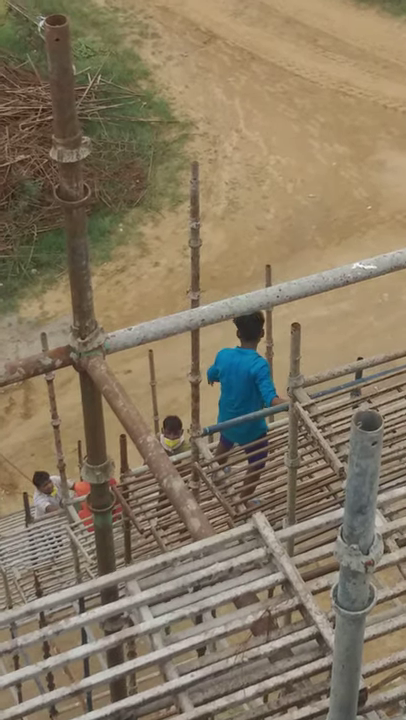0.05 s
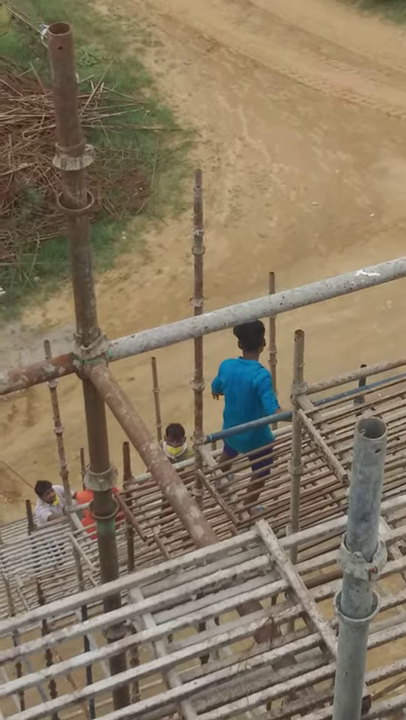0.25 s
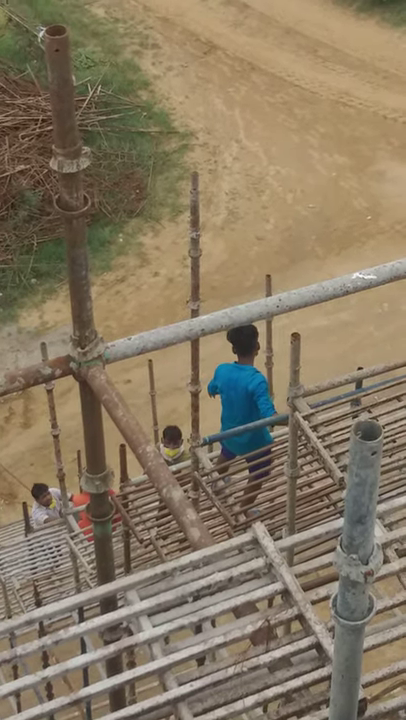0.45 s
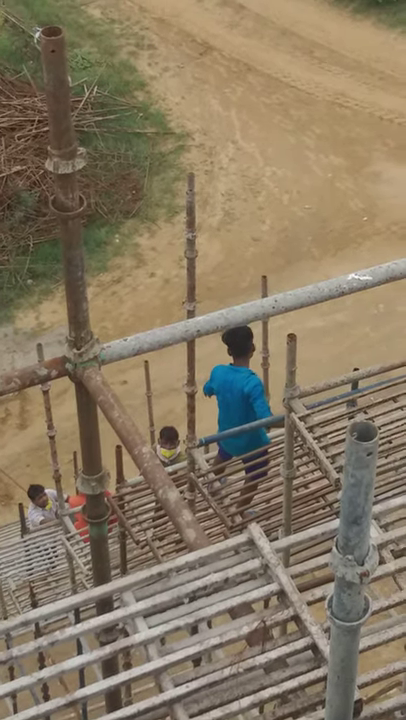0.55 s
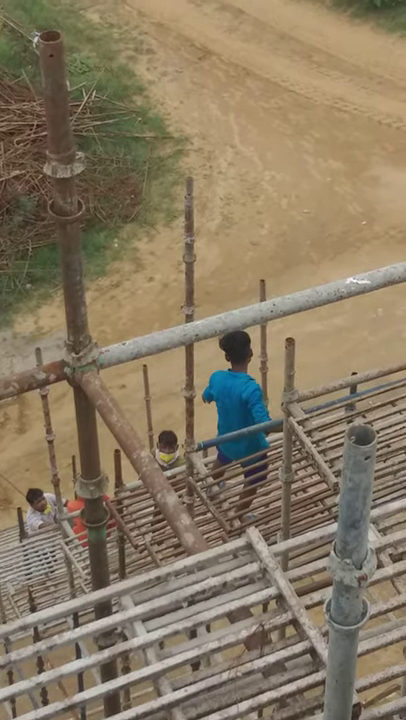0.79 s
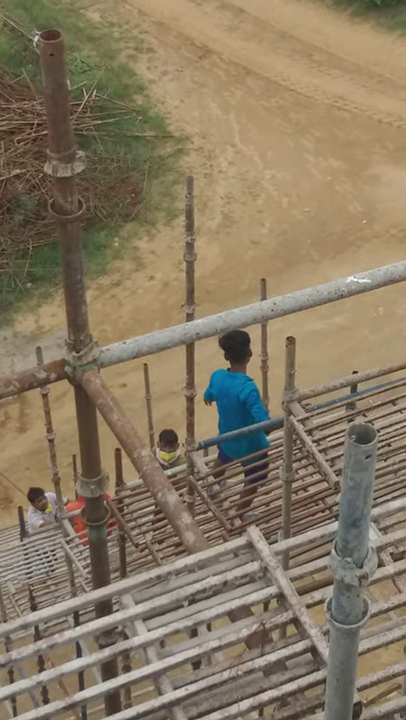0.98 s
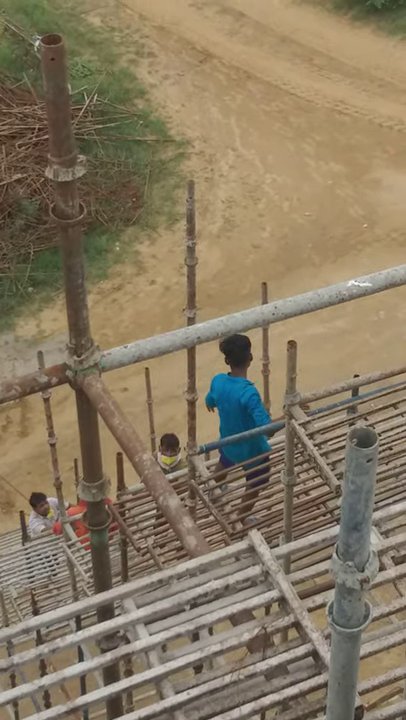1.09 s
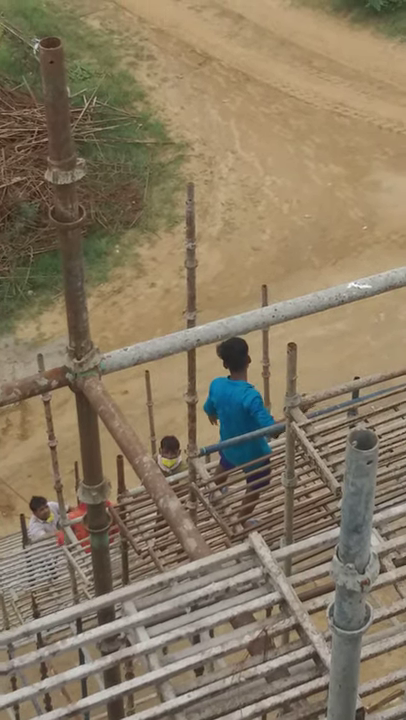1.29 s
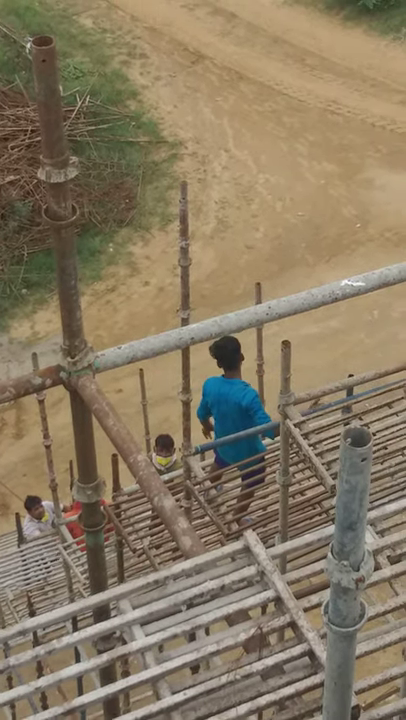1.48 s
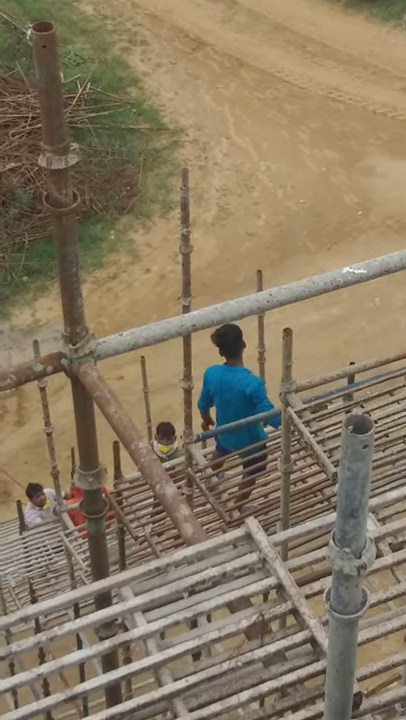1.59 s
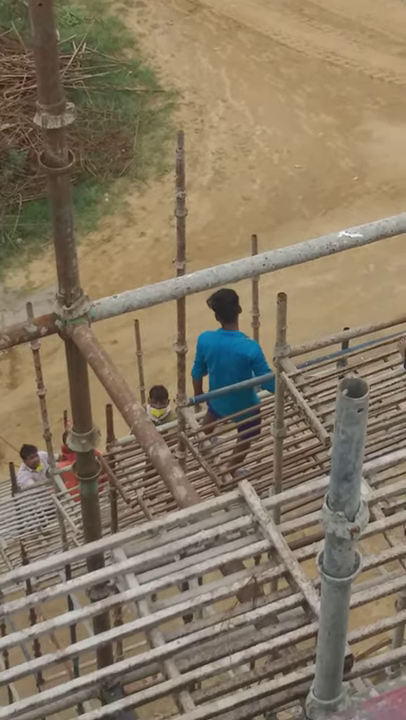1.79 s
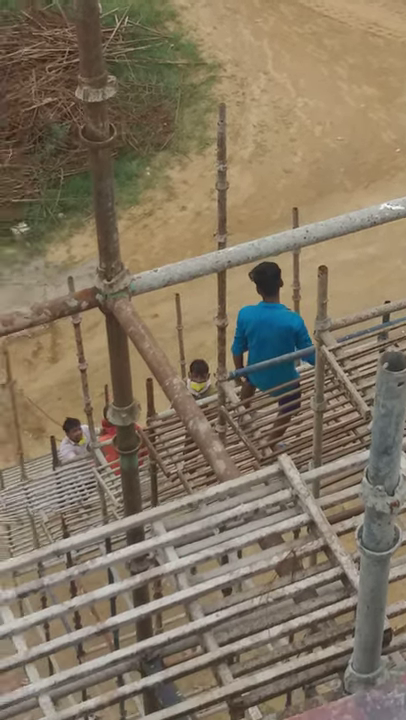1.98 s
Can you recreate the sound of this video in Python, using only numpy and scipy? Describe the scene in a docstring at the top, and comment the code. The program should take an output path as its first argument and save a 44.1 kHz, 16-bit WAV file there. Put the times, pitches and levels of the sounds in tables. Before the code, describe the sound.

A steel bar drops with a bright ringing clang, then duller knocks rattle across metal scaffolding outdoors.

```python
"""Steel bar dropped on a scaffold

A steel reinforcing bar lands on a stack of bars: noise bursts make the contact and chatter, fading
sines and crowded partials make the bright ring, which is damped as the bar settles. Duller knocks
follow as the bars shift: random mixtures of fixed modes. The deck of tubes thuds, booms and rattles
under the workers, and a neighbouring bar clinks. Shaped noise makes the low open-air rumble and hiss."""
import sys
import numpy as np
from scipy import signal
from scipy.fft import rfft, irfft, next_fast_len
from scipy.io import wavfile

SR = 44100
rng = np.random.default_rng(int(sys.argv[2]) if len(sys.argv) > 2 else 0)


def store_wav(level_fs):
    """Save 16-bit WAV to argv[1]."""
    pcm = np.round(np.clip(np.atleast_2d(level_fs), -1, 1) * 32767)
    wavfile.write(sys.argv[1], SR, pcm.T.astype(np.int16))


N = 90404
SIZE = next_fast_len(N)  # a length that transforms quickly
T, FREQ = np.arange(N) / SR, np.fft.rfftfreq(SIZE, 1 / SR)  # time [s], frequency [Hz]
NEXT_S, NEXT_RISE_S = 0.862, 0.004  # time of the neighbouring bar's clink; build-up of its tones


def amp(db):
    """Turn decibels into a plain multiplier."""
    return 10 ** (np.asarray(db) / 20)


def unit(x):
    """Scale a sound to an rms (average strength) of 1."""
    return x / np.sqrt(np.mean(x ** 2))


def colour(points):
    """Gain per frequency through (Hz, dB) points, falling 48 dB per octave outside them."""
    hz, db = np.array(points, float).T
    octave = np.log2(np.maximum(FREQ, 1))
    nearest = np.clip(octave, np.log2(hz[0]), np.log2(hz[-1]))
    outside = np.abs(octave - nearest)
    return amp(np.interp(octave, np.log2(hz), db) - 48 * outside)


def excite(spectrum):
    """Sound every frequency of a spectrum with a new random phase; rms 1."""
    phases = np.exp(2j * np.pi * rng.random(len(FREQ)))
    return unit(irfft(spectrum * phases, SIZE)[:N])


def noise(points):
    """Noise coloured by (Hz, dB) points; rms 1."""
    return excite(colour(points))


def crowd(spacing_hz, scatter_db):
    """Spectrum of up to 800 thin lines: unevenly spaced modes of unequal strength."""
    place, strength = rng.uniform(-1, 1, (800, 2)).T
    hz = (np.arange(len(place)) + 1 + place / 2) * spacing_hz
    bins = np.abs(hz * SIZE / SR).astype(int)
    audible = bins < len(FREQ)
    lines = np.zeros(len(FREQ))
    lines[bins[audible]] = amp(scatter_db * strength)[audible]
    return lines


def envelope(start, rise, t60, hold=0):
    """Straight build-up, hold, then a decay that loses 60 dB every t60 seconds."""
    age = T - start
    build_up = np.clip(age / max(rise, 1e-4), 0, 1)
    return build_up * np.exp(-np.log(1000) * np.maximum(age - rise - hold, 0) / t60)


def flutter(rate):
    """Random wavering: 'rate' random points a second, joined by straight lines."""
    return np.interp(T * rate, np.arange(2000), rng.standard_normal(2000))


def mode(start, rise, hz, db, t60):
    """One decaying sine of random phase; its level counts as rms before the envelope."""
    sine = np.sin(2 * np.pi * (hz * T + rng.random()))
    return np.sqrt(2) * amp(db) * envelope(start, rise, t60) * sine


def damping(start, db_per_s):
    """Extra decay from a given time on, as when a ringing bar is touched."""
    return amp(-db_per_s * np.maximum(T - start, 0))


def background():
    """Open air: a wavering low rumble and a faint, steady hiss, both made of shaped noise."""
    # colour of the rumble and of the hiss: (frequency [Hz], relative level [dB])
    rumble = [(25, -30), (70, -1), (140, 0.5), (380, -4), (600, -19.5), (1000, -29.5), (2000, -34),
              (3000, -53.5)]
    hiss = [(1000, 6.5), (13500, -2), (15500, -8)]
    wavering_db = -50 + 2 * flutter(14)
    return amp(wavering_db) * noise(rumble) + amp(-78) * noise(hiss)


def shudder():
    """The whole scaffold shakes: deep noise whose level rises and falls with time."""
    # colour of the shaking: (frequency [Hz], relative level [dB])
    shake_colour = [(40, -27.5), (65, -7), (145, 2), (260, -16)]
    # strength of the shaking: (time [s], level [dB])
    shake_level = [(0, -52), (.14, -59), (.24, -33.5), (.4, -42), (.72, -40.5), (.95, -49.5), (1.14, -40.5),
                   (1.6, -47.5), (2.05, -53)]
    seconds, db = np.array(shake_level).T
    return amp(np.interp(T, seconds, db)) * noise(shake_colour)


def fading_bar():
    """A bar still ringing faintly at the start: one dying sine."""
    # its single mode: (frequency [Hz], level [dB], t60 [s])
    fading = (1981, -66, .6)
    return mode(0, NEXT_RISE_S, *fading)


def stack():
    """Each knock rings the same crowded modes of deck, tubes and bars: a crack, then a rattling tail."""
    # knocks: (time [s], build-up [s], deck thud [dB], tube clack [dB], bar ring [dB], bright zing [dB])
    knocks = [(0.159, 0.006, -41.5, -69, -87, -93), (0.222, 0.011, -25, -23.5, -32, -67),
              (0.265, 0.0021, -27.5, -27, -25, -53), (0.392, 0.013, -33, -35.5, -37, -40),
              (0.452, 0.0052, -32, -34.5, -39, -58), (0.565, 0.018, -30, -31, -42.5, -43.5),
              (0.600, 0.0039, -29, -35, -33, -36), (0.686, 0.0013, -31, -35.5, -42, -61),
              (0.866, 0.0017, -42, -40.5, -42.5, -46.5), (0.986, 0.00081, -39, -52.5, -80.5, -88),
              (1.03, 0.0046, -33, -37, -43.5, -55), (1.121, .005, -34, -39, -46.5, -59),
              (1.172, 0.028, -37, -41, -42, -74), (1.319, 0.0029, -38.5, -43.5, -53.5, -94.5),
              (1.339, 0.0024, -36.5, -42.5, -47.5, -73.5), (1.439, 0.0012, -32, -39, -48, -77),
              (1.492, 0.011, -38.5, -44, -50.5, -78), (1.713, 0.0025, -38.5, -49.5, -63, -85),
              (1.738, .012, -45, -53, -56.5, -84), (1.907, 0.0028, -41, -49.5, -64, -90),
              (1.927, 0.0018, -37.5, -44.5, -56, -84.5), (1.992, .003, -46.5, -50.5, -56.5, -81.5)]
    # four registers: (colour as (frequency [Hz], relative level [dB]), mode spacing [Hz], t60 [s])
    thud = ([(80, -28), (150, -6.5), (260, 2), (420, 0), (560, -5), (750, -21.5)], 4, 0.63)
    clack = ([(400, -17), (600, 5.5), (850, 2.5), (1100, -0.5), (1350, -17), (1700, -24.5)], 9, 0.48)
    ring = ([(1100, -26), (1500, 2), (1750, 5.5), (2200, 0), (2750, -30)], 16, 0.44)
    zing = ([(2400, -8.5), (3400, -1), (4800, -4), (5900, -15), (7200, -15), (8400, -40)], 40, 0.37)
    crack_db, crack_s = -13, 0.0053  # extra strength at the start of a knock, and its decay time
    rattle_db, rattle_per_s = 1, 220  # unevenness of the tail, and its random points a second

    registers = []
    for points, spacing, t60 in (thud, clack, ring, zing):
        registers.append((crowd(spacing, scatter_db=6.5) * colour(points), t60))

    out = np.zeros(N)
    for start, rise, *levels in knocks:
        crack = 1 + amp(crack_db) * np.exp(-np.maximum(T - start, 0) / crack_s)
        rattle = amp(rattle_db * flutter(rattle_per_s))
        ringing = np.zeros(N)
        for db, (lines, t60) in zip(levels, registers):
            ringing += amp(db) * excite(lines) * envelope(start, rise, t60)
        out += crack * rattle * ringing
    return out


def dropped_bar():
    """A bright contact and chatter start the bar's modes, which die faster once it lies on the stack."""
    # colours of first contact, chatter, crowded upper partials, stack ringing along,
    # and fine high partials that shimmer in the tail: (frequency [Hz], relative level [dB])
    tink_colour = [(2800, -18.5), (3400, 7), (3900, -1), (6000, -15.5), (7000, -1), (9300, -29),
                   (15500, -21)]
    chatter_colour = [(900, -16.5), (1350, 0.5), (2200, 3.5), (2850, -9.5), (3500, 5), (4800, 0),
                      (5800, -7.5), (7500, -9.5), (9200, -34), (15500, -19.5)]
    partial_colour = [(2400, -8.5), (2900, -17), (3300, -5.5), (4700, -4.5), (5700, -11), (7700, -7),
                      (8600, -22), (9400, -33)]
    wash_colour = [(900, -17.5), (1350, -0.5), (2200, 5), (2850, -11), (4800, -3.5), (8000, -21.5)]
    shimmer_colour = [(8600, -10.5), (9400, -21.5), (10300, -8), (12000, 0), (13400, -7), (15500, -5.5)]
    # main modes, before trim and damping: (frequency [Hz], relative level [dB], t60 [s])
    bar_modes = [(1668, -27.5, .7), (1719, -28.5, .72), (1829, -26, .65), (1916, -22.5, 1.4),
                 (2101, -29.5, 1.6), (2163, -34, 1.4), (2198, -27.5, .8), (3327, -36, .66),
                 (3417, -29, .55), (3499, -37, .6), (3649, -29.5, .62), (3706, -28.5, .81),
                 (4048, -34, .55), (4163, -33, .62), (4285, -37, 1.1), (4420, -36, .6), (4549, -34.5, .9),
                 (4681, -34, .6), (4818, -41, 1.6), (4973, -33.5, .46), (5712, -45, 1.4), (6331, -47, .9),
                 (7402, -42, .6), (7765, -43, .75), (10130, -61, 1.8), (10900, -60, 1.3), (11487, -45, .5)]
    # thin partials, undamped until the next clink: (frequency [Hz], level [dB], t60 [s] before damping)
    bar_sing = [(5173, -48.5, 1.7), (7187, -56, 1.6)]
    drop_s, settle_s = 0.2191, 0.66  # first contact; start of the damping
    ring_rise_s, chatter_rise_s = 0.041, 0.0083
    settle_db_per_s, ring_damp_db_per_s = 75, 92

    tink = amp(-23.5) * noise(tink_colour) * envelope(drop_s, 0.002, 0.17)

    chatter_db = -21 + 2 * flutter(350)
    chatter = amp(chatter_db) * noise(chatter_colour)
    chatter *= envelope(drop_s, chatter_rise_s, 0.17, hold=0.035)

    partials = amp(-29) * excite(crowd(75, scatter_db=3) * colour(partial_colour))
    partials *= envelope(drop_s, chatter_rise_s, 1)
    wash = amp(-29.5) * excite(crowd(19, scatter_db=6.5) * colour(wash_colour))
    wash *= envelope(drop_s, ring_rise_s, 1)
    shimmer = amp(-37) * excite(crowd(48, scatter_db=6.5) * colour(shimmer_colour))
    shimmer *= envelope(drop_s, ring_rise_s, 0.79)
    crowded = (partials + wash + shimmer) * damping(settle_s, settle_db_per_s)

    ring = amp(-0.5) * sum(mode(drop_s, ring_rise_s, *row) for row in bar_modes)
    ring *= damping(settle_s, ring_damp_db_per_s)
    sing = sum(mode(drop_s, ring_rise_s, *row) for row in bar_sing)
    sing *= damping(NEXT_S, settle_db_per_s)
    return tink + chatter + crowded + ring + sing


def deck_booms():
    """Heavy knocks set single tubes of the deck booming, each a decaying sine."""
    # booms: (time [s], frequency [Hz], level [dB], t60 [s])
    tube_booms = [(0.231, 271, -29.5, 0.79), (.66, 176.4, -35, 0.23), (0.688, 365.6, -29, 0.22),
                  (0.889, 352, -42.5, 0.43), (1.333, 594.5, -36.5, 0.21)]
    return sum(mode(start, 0.019, hz, db, t60) for start, hz, db, t60 in tube_booms)


def next_bar():
    """A neighbouring bar clinks lightly: a noisy contact and a set of decaying sines."""
    # colour of the contact: (frequency [Hz], relative level [dB])
    clink_colour = [(700, 6), (1250, -2.5), (2200, 8), (2900, -22), (3500, -4), (5400, -6.5), (7500, -30)]
    # modes of the bar: (frequency [Hz], relative level [dB])
    next_modes = [(1739, -5), (1992, -1), (2110, 1), (2202, -2), (2315, 1), (3295, -7), (3531, -4),
                  (3628, -7), (4430, -9), (4549, -8), (4689, -5), (4834, -8), (5399, -11)]
    modes_db, modes_t60_s = -46, 0.44
    contact = amp(-43) * noise(clink_colour) * envelope(NEXT_S, NEXT_RISE_S, 0.24, hold=0.032)
    ring = sum(mode(NEXT_S, NEXT_RISE_S, hz, modes_db + db, modes_t60_s) for hz, db in next_modes)
    return contact + ring


def rap(start):
    """A hard contact sets a few heavily damped modes off together."""
    # modes of the contact: (frequency [Hz], relative level [dB], t60 [s])
    rap_modes = [(370, -3, 0.026), (605, -1, 0.024), (860, -9, 0.03), (1724, -15.5, 0.033)]
    out = np.zeros(N)
    for hz, db, t60 in rap_modes:
        out += amp(db) * envelope(start, 0.001, t60) * np.sin(2 * np.pi * hz * (T - start))
    return out


def deck_raps():
    """Heavy knocks make hard, dead contacts on the deck, which die within hundredths of a second."""
    # contacts: (time [s], level [dB])
    rap_times = [(1.032, -28), (1.4385, -24.5), (1.457, -31.5), (1.927, -27.5), (1.943, -30.5)]
    return sum(amp(db) * rap(start) for start, db in rap_times)


def slide():
    """Bars slide on each other: a short, faint ringing of crowded modes."""
    # colour of the slide: (frequency [Hz], relative level [dB])
    scrape_colour = [(3200, -3), (3600, 6), (4200, -2)]
    ringing = excite(crowd(63, scatter_db=2) * colour(scrape_colour))
    return amp(-61) * ringing * envelope(1.151, 0.048, 0.45)


def scene():
    """Add all sources, nearly mono; the ringing register leans to the left."""
    # lean to the left: (frequency [Hz], left minus right [dB])
    balance = [(1100, 0), (1400, 1.5), (1950, 4), (2700, 0)]
    mono = background() + shudder() + fading_bar() + stack() + dropped_bar()
    mono += deck_booms() + next_bar() + deck_raps() + slide()
    spectrum = rfft(mono, 2 * SIZE)
    hz, db = np.array(balance, float).T
    lean = np.interp(np.fft.rfftfreq(2 * SIZE, 1 / SR), hz, db)
    # half of the difference goes to each side
    return np.array([irfft(spectrum * amp(side * lean / 2))[:N] for side in (1, -1)])


def record(dry):
    """A steep low-pass filter cuts the treble above 15800 Hz."""
    low_pass = signal.ellip(10, 0.2, 80, 15800, fs=SR, output="sos")
    return signal.sosfilt(low_pass, dry)


dry = scene()
out = record(dry)
store_wav(out)
```